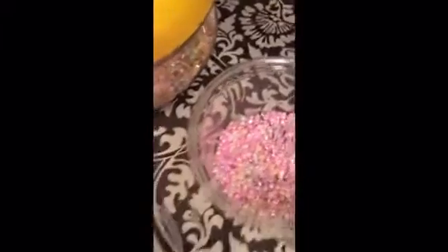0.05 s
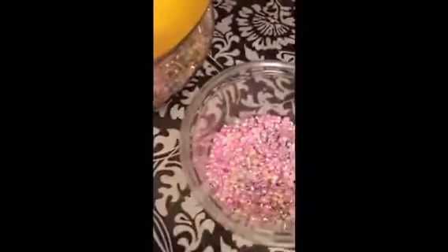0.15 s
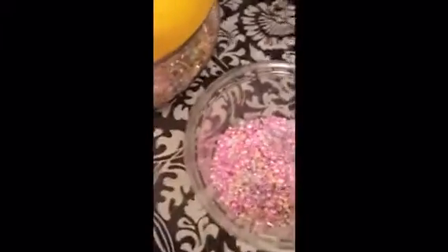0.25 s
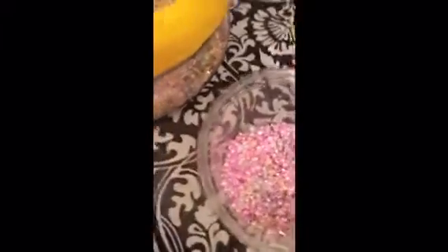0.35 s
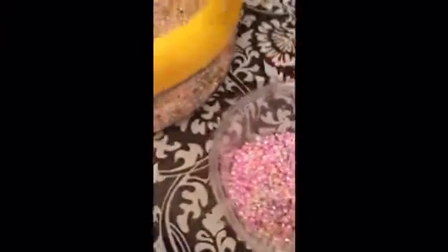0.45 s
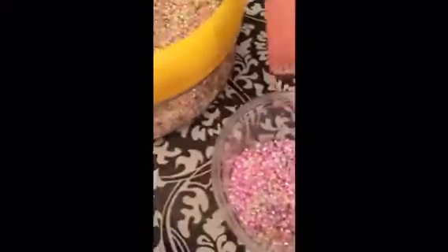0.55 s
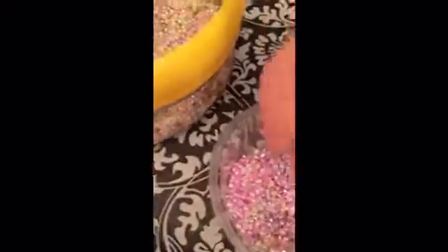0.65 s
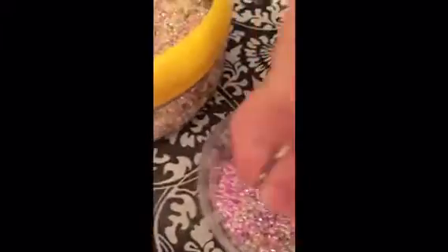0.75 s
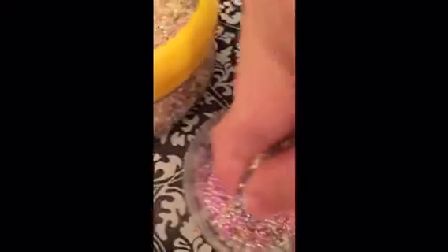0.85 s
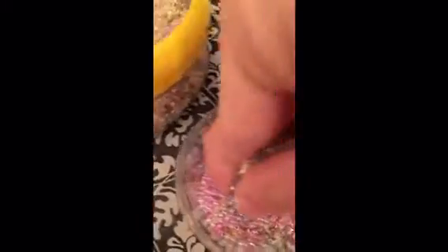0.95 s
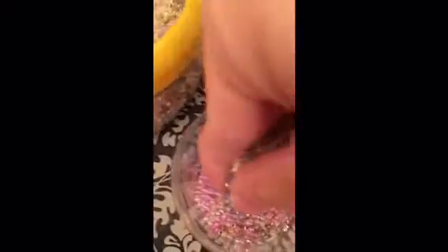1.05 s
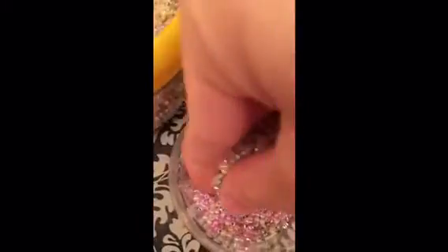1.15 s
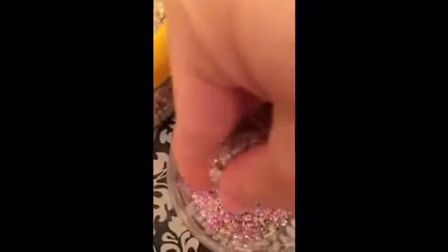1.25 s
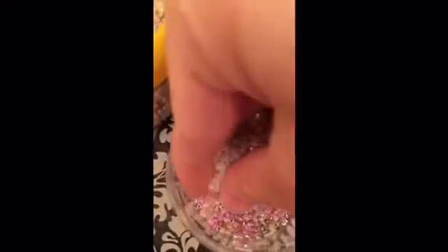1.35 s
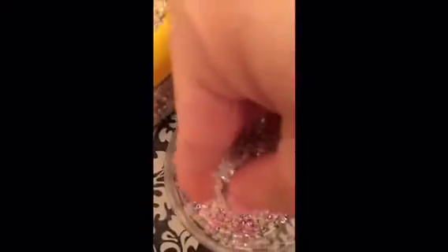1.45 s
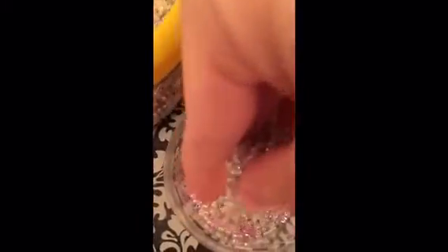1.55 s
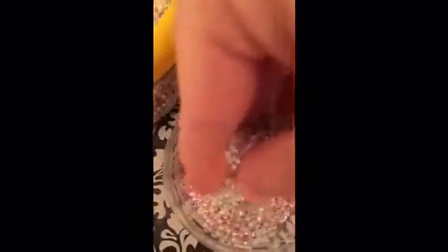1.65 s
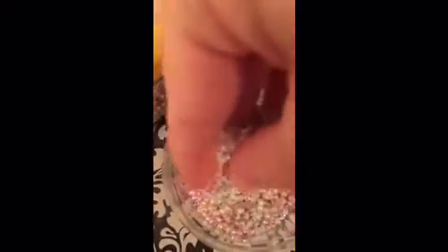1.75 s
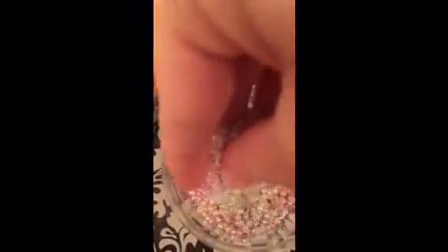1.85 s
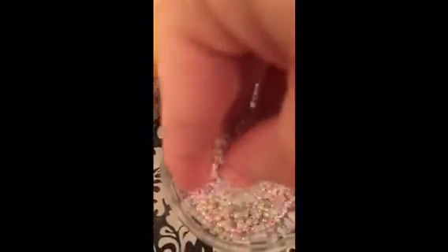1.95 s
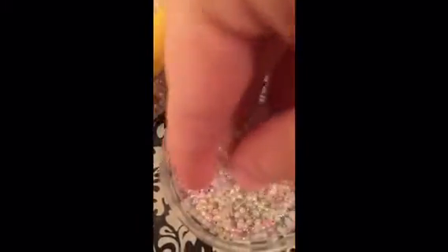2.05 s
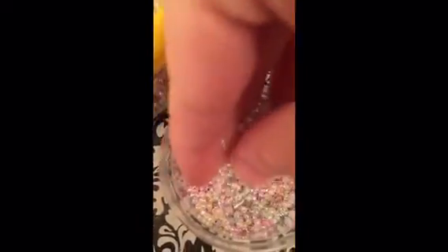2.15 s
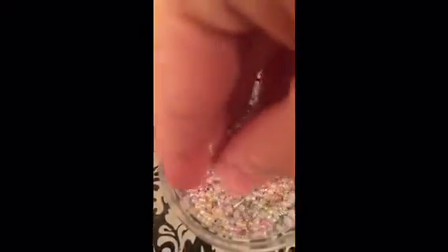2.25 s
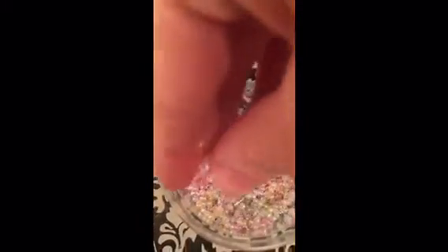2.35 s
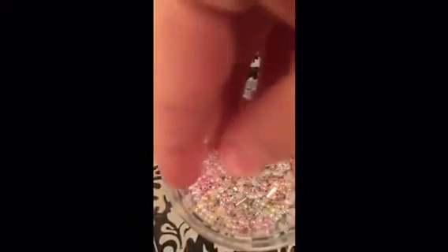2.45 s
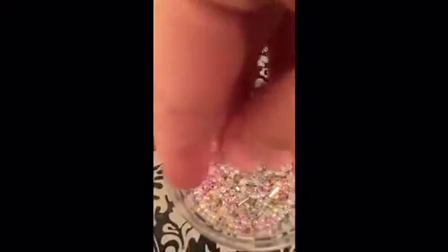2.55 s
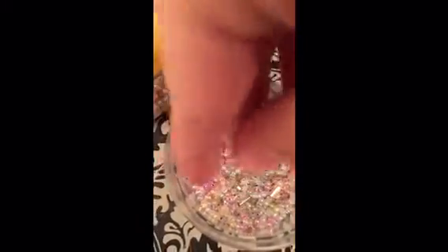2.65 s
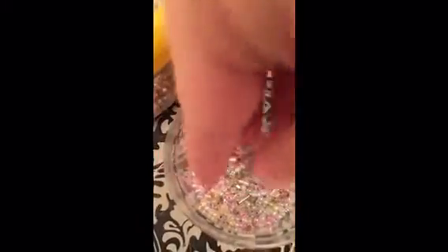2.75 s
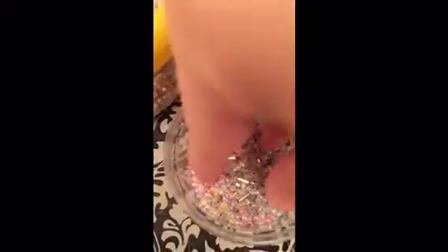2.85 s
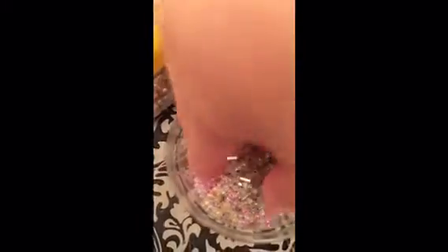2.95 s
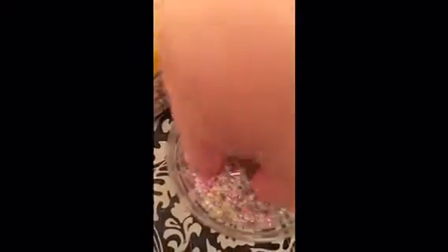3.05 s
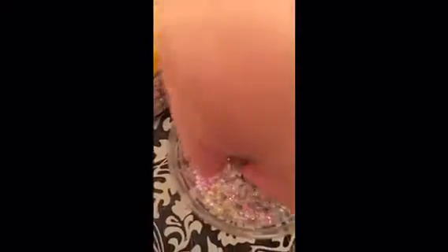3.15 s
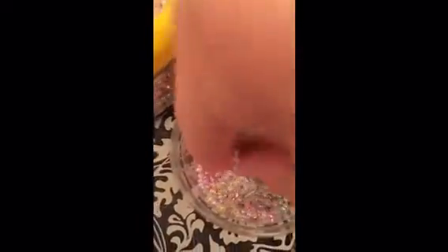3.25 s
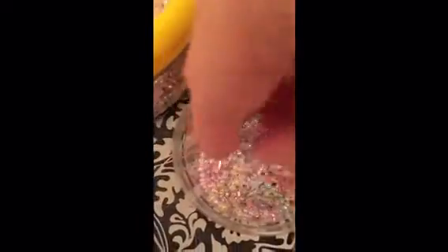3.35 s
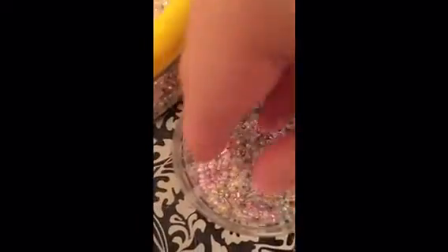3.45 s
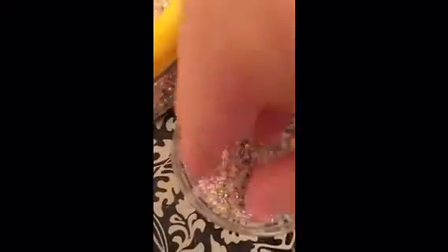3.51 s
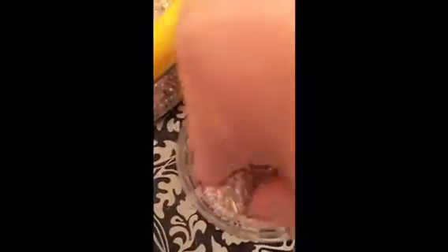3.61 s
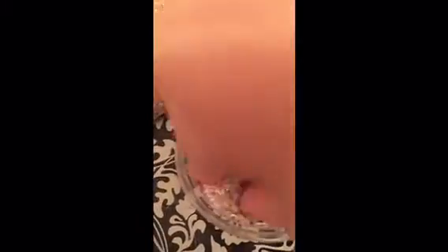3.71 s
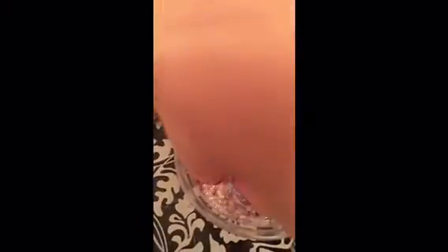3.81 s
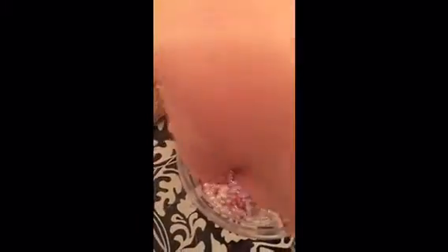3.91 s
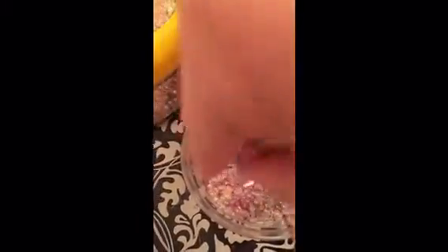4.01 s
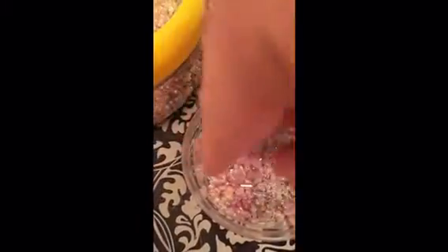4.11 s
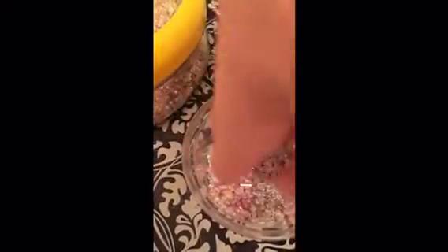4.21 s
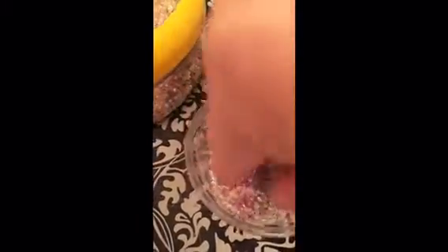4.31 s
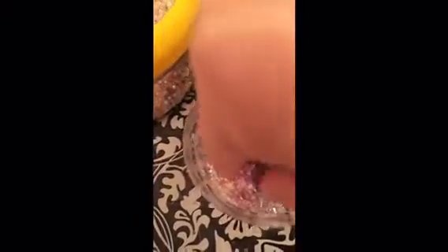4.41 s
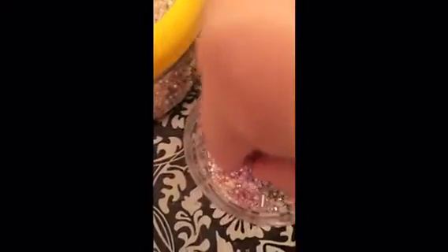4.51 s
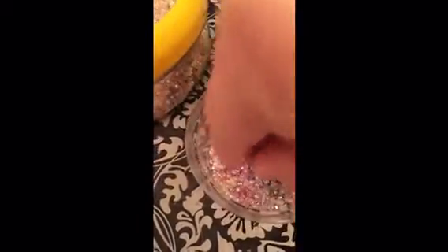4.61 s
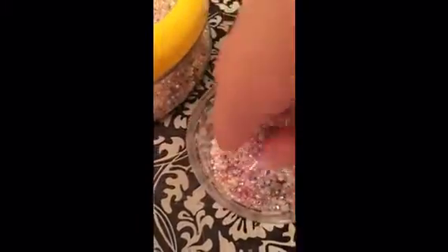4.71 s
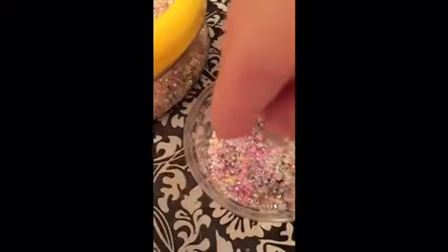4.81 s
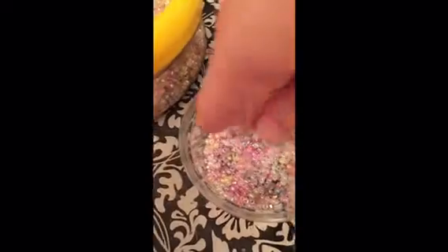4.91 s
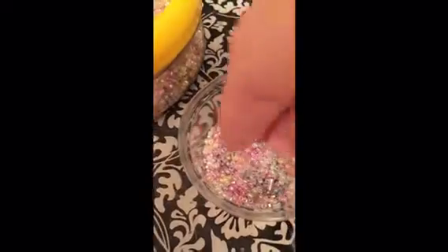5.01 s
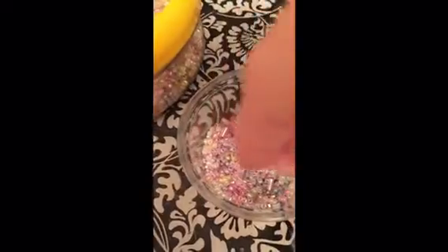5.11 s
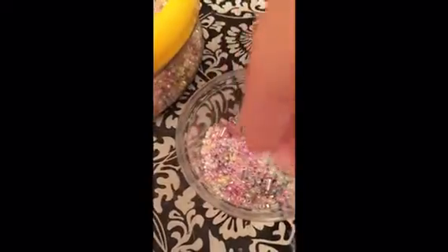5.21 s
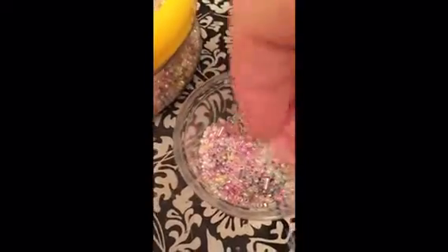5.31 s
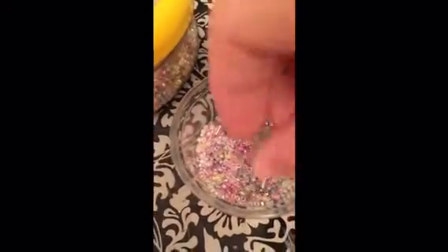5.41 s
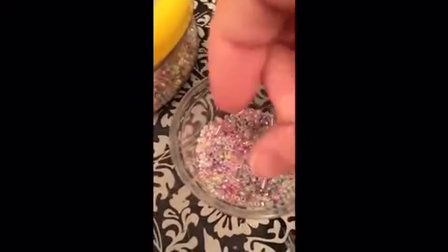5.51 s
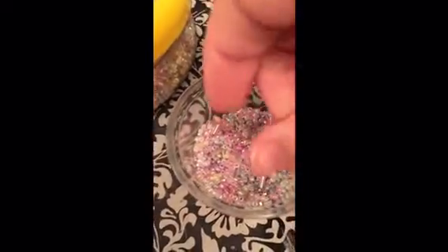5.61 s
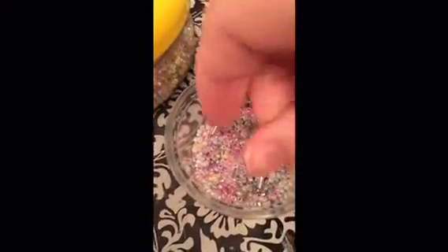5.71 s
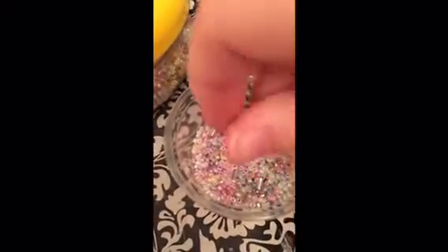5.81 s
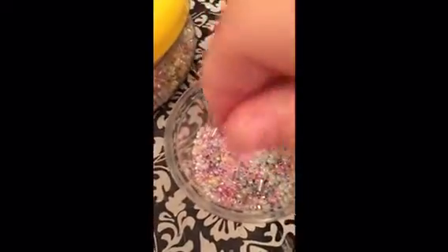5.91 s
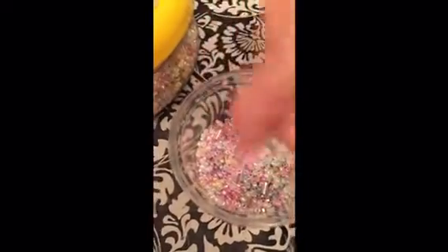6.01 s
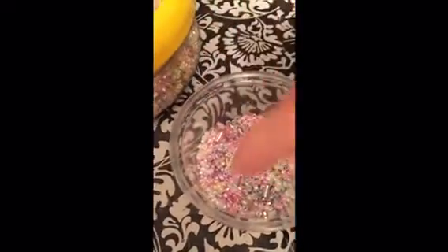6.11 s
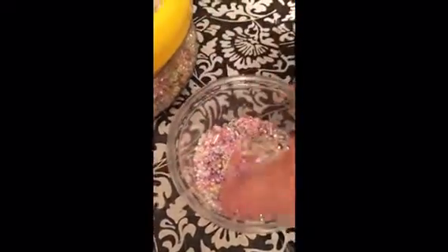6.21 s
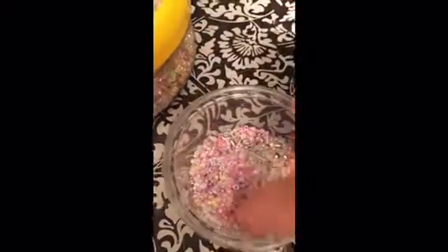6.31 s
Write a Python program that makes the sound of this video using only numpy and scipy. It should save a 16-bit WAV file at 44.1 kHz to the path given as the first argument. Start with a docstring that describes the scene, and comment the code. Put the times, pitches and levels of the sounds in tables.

```python
"""Bright clicks and a dense rustle, close to a phone: fingers dig, pinch and stir small plastic beads
in a glass bowl on a table. Each contact is a filtered pulse scattered through the heap; random contacts
merge into the rustle, single beads click on their own, and damped resonances ring the glass.
Noise bands make the skin's rub, the bumps on the phone and a quiet room with a thin whine behind.
The phone's noise suppressor dulls the hiss about a third of a second after the last sharp sound."""
import sys
import numpy as np
from scipy import signal
from scipy.fft import rfft, irfft
from scipy.io import wavfile
from scipy.ndimage import uniform_filter1d, minimum_filter1d, map_coordinates

SR = 44100
rng = np.random.default_rng(int(sys.argv[2]) if len(sys.argv) > 2 else 0)


def digitize_waveform(pressure):
    """Quantize a signal to 16-bit integers and store it at the path in sys.argv[1].

    Rows of a 2-D input are taken as channels; values are limited to [-1, 1].
    """
    field = np.atleast_2d(pressure).T
    bounded = np.clip(field, -1, 1)
    quanta = np.round(bounded * 32767).astype(np.int16)
    wavfile.write(sys.argv[1], SR, quanta)


N = 280734
TIME = np.arange(N) / SR
EDGE_HZ = 15400  # upper limit of the phone's band
SLIDE_PER_S, SLIDE_KNOCK_DB = 4700, -14.5  # a shove makes the beads slide: dense, light contacts
STROKE_RISE_DB_PER_S, STROKE_FALL_DB_PER_S = 1501.5, 521


# Fingers pinching and stirring the heap. Each row: start in seconds, length in seconds, level in dB,
# growth over the stroke in dB, share of the bowl's low knock in dB, contacts per second.
FINGER_STROKES = [(1.287, 0.041, -25, -3, -7.5, 1020), (1.362, 0.05, -29.5, 1.5, -8.5, 1500),
                  (1.434, 0.22, -28, -0.5, -13, 2000), (1.661, 0.1, -30, -5, -14, 1600),
                  (1.867, 0.16, -25.5, -2, -10.5, 3050), (2.025, .14, -29.5, -4.5, -13, 1830),
                  (2.195, 0.062, -35.5, -6.5, -16.5, 670), (2.322, 0.02, -50, -5.5, -13, 370),
                  (2.399, 0.067, -25, -7, -12, 2600), (2.475, .07, -34.5, -12, -13, 670),
                  (2.7, .05, -48, 0, -17, 310), (3.21, .115, -44.5, 3.5, -16, 2500),
                  (3.338, 0.044, -32, 5.5, -25, 2200), (3.404, 0.044, -32.5, -6.5, -27, 1200),
                  (3.498, .033, -49.5, -8, -7, 450), (3.591, 0.0088, -50.5, 3, -6, 460),
                  (3.743, .17, -43.5, 8.5, -13.5, 3500), (3.921, 0.13, -36, -5.5, -19.5, 2600),
                  (4.061, 0.054, -33, 4, -21, 3000), (4.128, 0.066, -35.5, -8.5, -27, 1100),
                  (4.619, .11, -50, -1.5, -22, 1200), (4.747, 0.011, -39, 7.5, -29, 660),
                  (4.79, 0.068, -53.5, -3, -16, 410)]
# Fingertips shoving down to the bottom of the bowl. Each row: time of full push in seconds,
# rise in dB per second, hold in seconds, level in dB, fall in dB per second, level of the skin's rub in dB.
FINGER_SHOVES = [(2.914, 3500, .02, -32, 180, -53.5), (3.078, 380, 0.067, -37.5, 229, -59.5),
                 (3.657, 2000, 0.015, -26.5, 402, -49.5), (4.351, 1400, 0.028, -29.5, 220, -55.5),
                 (4.516, 450, 0.011, -38.5, 180, -60)]


def movements():
    """Strokes and shoves add in power, which weights their bearing on the glass and contacts per second."""
    moves = []
    for start, length, db, growth_db, knock_db, rate in FINGER_STROKES:
        gain = gesture(start, length, db, growth_db, STROKE_RISE_DB_PER_S, STROKE_FALL_DB_PER_S)
        moves.append((gain, knock_db, rate))
    for start, rise, hold, db, fall, _ in FINGER_SHOVES:
        moves.append((gesture(start, hold, db, 0, rise, fall), SLIDE_KNOCK_DB, SLIDE_PER_S))
    power = sum(gain ** 2 for gain, _, _ in moves)
    press = sum(gain ** 2 * gain_of(knock_db) for gain, knock_db, _ in moves) / power
    rate = sum(gain ** 2 * rate for gain, _, rate in moves) / power
    return np.sqrt(power), press, rate


def gesture(start, length, db, growth_db, rise, fall):
    """Gain of one finger movement: attack, a hold that grows or sags, release (rise and fall in dB per s)."""
    age = TIME - start
    level = db + growth_db * np.clip(age / length, 0, 1)
    level += rise * np.minimum(age, 0)
    level -= fall * np.maximum(age - length, 0)
    return gain_of(np.maximum(level, -150))


# Skin brushing the beads lightly. Each row: time in seconds, level in dB.
SKIN_BRUSH = [(5.72, -84.5), (5.78, -66), (5.825, -62.5), (5.852, -45), (5.875, -78), (5.95, -77),
              (6.15, -103), (6.29, -82), (6.345, -56.5), (6.366, -38)]


def heap(effort, press, rate, brush_knock_db=-17):
    """Beads grind and slide as the fingers work; pressing them on the glass adds the low knock."""
    ticks, knocks = contacts(rate, spread_db=5.2, clump_db=1.2)
    worked = effort * (ticks + press * knocks)
    brush = gain_of(np.interp(TIME, *np.transpose(SKIN_BRUSH), left=-120))
    return worked + brush * (ticks + gain_of(brush_knock_db) * knocks)


def contacts(rate, spread_db, clump_db, count=48, order=12):
    """Random contacts of steady mean power, clumped into small slips; returns their ticks and their knocks."""
    slips = evened(uniform_filter1d(rng.standard_normal(N), size=130))
    uneven = (1500 / rate) ** 0.38  # a fast slide is smoother than a pinch
    spread = spread_db * np.minimum(rng.exponential(1, N), 4)
    strength = gain_of(uneven * (spread + clump_db * slips))
    hits = strength * (rng.random(N) < rate / SR)
    power = uniform_filter1d(uniform_filter1d(hits ** 2, size=800), size=400)
    hits = hits / np.sqrt(abs(power) + 1e-4)
    # only a handful of beads touch at a time, and others take their place as time goes on
    bead = ((count * TIME).astype(int) + rng.integers(0, order, N)) % count

    def played(make):
        return sum(signal.oaconvolve(hits * (bead == k), make())[:N] for k in range(count))

    return played(tick), played(knock)


# Colour of a contact between beads. Each row: frequency in Hz, relative level in dB.
BEAD_COLOUR = [(500, -44.5), (1200, -24.5), (2200, -13.5), (2900, -12.5), (3700, -12.5), (4600, -11),
               (5600, -6.5), (6700, -2), (7400, -2), (8500, 2), (9700, 0), (10500, -4), (12200, 0),
               (15200, -2.5)]


def tick():
    """Bead against bead: a bright pulse with a strong pitch of its own."""
    return contact(BEAD_COLOUR, scatter=0.77, scatter_s=0.0013)


# Colour of a contact that bears on the bowl. Each row: frequency in Hz, relative level in dB.
KNOCK_COLOUR = [(150, -43.5), (600, -28.5), (900, -21.5), (1300, -11), (1700, -9), (2000, -1.5), (2500, -2),
                (2950, -5.5), (3500, -1.5), (5000, -5.5), (9000, -20)]


def knock():
    """The push of a bead on the bowl: a lower pulse with a broad, weak pitch."""
    return contact(KNOCK_COLOUR, scatter=.55, scatter_s=.0012, ring_db=2.5, ring_octaves=0.6, tilt_db=2.15)


def contact(colour, scatter, scatter_s, ring_db=9, ring_octaves=0.26, tilt_db=1.5, smear_s=0.00012, size=1024):
    """One click of unit energy: a sharp pulse with its own pitch, then its scatter through the heap."""
    signed_hz = np.fft.fftfreq(size, 1 / SR)
    hz = abs(signed_hz) + 1
    t = np.arange(size) / SR
    octave = np.log2(hz / 7000)
    pitch = rng.uniform(-1.086, 0.92)  # octaves from 7 kHz
    own = ring_db * np.exp(-((octave - pitch) / ring_octaves) ** 2)
    tilt = tilt_db * rng.standard_normal() * np.maximum(octave, -2)
    level = read(colour, hz) + own + tilt
    level = level - 20 * np.clip((hz - EDGE_HZ) / 1000, 0, 1)
    pulse = np.exp(np.conj(signal.hilbert(np.log(gain_of(level)))))  # causal phase
    # the heap delays high notes a little more
    pulse = pulse * np.exp(-1j * np.pi * signed_hz * smear_s * (1 + hz / EDGE_HZ))
    paths = scatter * unit(rng.standard_normal(size) * np.exp(-t / scatter_s))
    paths[0] = 1  # the direct path
    click = unit(np.fft.ifft(pulse * np.fft.fft(paths)).real)
    return rng.choice([-1, 1]) * click


# Single beads that snap free or drop. Each row: time in seconds, level in dB over one millisecond
# (before softening, glass and room), share of the bowl's low knock in dB.
BEAD_CLICKS = [(0.277, -41.5, -11), (0.337, -43, -30), (1.0656, -26.5, 0), (1.0666, -21.5, -11.5),
               (1.0715, -25, -13), (1.1577, -40, -30), (1.2398, -19.5, -8.5), (1.242, -16.5, 1.5),
               (1.261, -20.5, -13), (1.2822, -21, -4), (1.3125, -20, -3.5), (1.3325, -24, -8),
               (1.4094, -25.5, -9), (1.4842, -22, -13.5), (1.5887, -22, -5), (1.715, -24, -2),
               (1.7443, -14.5, -13), (1.8147, -23.5, -13.5), (1.8275, -15, -1), (1.8408, -21, -7),
               (1.8545, -21, -4.5), (1.8884, -17.5, 1), (2.1185, -15.5, -8), (2.1578, -14, -12),
               (2.2123, -23.5, -26), (2.2364, -21.5, -13), (2.2931, -26.5, -15.5), (2.3224, -22, -7.5),
               (2.3392, -19, -3), (2.3496, -21, -9), (2.367, -17, -11), (2.3833, -17.5, -13),
               (2.4456, -10, -22), (2.525, -23.5, 4), (2.5423, -17, -17), (2.6098, -28, -8),
               (2.611, -25.5, -11.5), (2.6426, -31.5, -15), (2.6802, -38.5, -22.5), (2.7092, -31, -26),
               (2.7304, -18, -17), (2.7325, -19, -13), (2.759, -34, -14), (2.7766, -42, -17),
               (2.832, -48, -10), (2.9308, -16.5, -27), (3.2317, -26, -10.5), (3.2655, -26, -18),
               (3.3782, -18.5, -19), (3.4969, -26, -2.5), (3.501, -21.5, -14), (3.534, -22, -10),
               (3.5844, -24, -23), (3.987, -21.5, -7.5), (4.1335, -24, -30), (4.1909, -23, -19),
               (4.2504, -27.5, -31), (4.7155, -22.5, -17.5), (4.7393, -27, -26), (4.7802, -26, -11),
               (4.7974, -24, -20), (4.822, -24.5, -31), (4.8468, -26.5, -26), (4.8805, -42, -23),
               (4.924, -45, -10), (4.9518, -36, -11), (4.958, -32.5, -16), (4.9928, -26.5, -17),
               (5.0172, -38, -17), (5.0258, -30, -15), (5.0728, -25.5, -7), (5.122, -29.5, -3.5),
               (5.1623, -46, -13)]


def single_beads(graze_db=-14, rebound_db=-19):
    """Each bead grazes a neighbour, strikes, and rebounds faintly a moment later."""
    out = np.zeros(N)
    for s, db, knock_db in BEAD_CLICKS:
        size = gain_of(db) * np.sqrt(SR / 1000)
        add(out, s - rng.uniform(0.0005, 0.0048), size * gain_of(graze_db) * tick())
        add(out, s, size * unit(tick() + gain_of(knock_db) * knock()))
        add(out, s + rng.uniform(0.0011, 0.0082), size * gain_of(rebound_db) * tick())
    return out


UNSETTLED_FROM_S, UNSETTLED_TO_S = 1.25, 5.17  # the disturbed heap keeps shedding beads between these


def loose_beads(effort, press, rate, snap_db=7, idle_db=-50, scatter_db=4.0, knock_db=6, count=170):
    """Jammed beads snap free, harder under a pinch than in a slide; between strokes faint ones settle."""
    out = np.zeros(N)
    slots = np.linspace(UNSETTLED_FROM_S, UNSETTLED_TO_S, count + 1)
    times = rng.uniform(slots[:-1], slots[1:])
    lucks = np.clip(rng.standard_normal(count), -2, 2)
    for s, luck in zip(times, lucks):
        now = round(s * SR)
        pinch = np.clip(2 * (1 - rate[now] / SLIDE_PER_S), 0, 1)
        snap = gain_of(snap_db) * effort[now] * pinch
        size = (snap + gain_of(idle_db)) * gain_of(scatter_db * luck) * np.sqrt(SR / 1000)
        add(out, s, size * unit(tick() + gain_of(knock_db) * press[now] * knock()))
    return out


def soften(x, top_db=-4, corner_hz=11500):
    """Separate clicks, dropped or snapped free, have weaker highest treble than the rustle of the worked heap."""
    hz = np.fft.rfftfreq(N, 1 / SR)
    return irfft(rfft(x) * gain_of(top_db / (1 + (corner_hz / (hz + 1)) ** 8)), N)


# The glass, damped by its filling. Each row: frequency in Hz, relative level in dB,
# time to fall by 60 dB in seconds.
GLASS_MODES = [(2380, 0, 0.017), (2535, -9, .03), (3590, -1, 0.0073), (4520, -1, .022), (6680, 0, 0.02),
               (8610, -10, 0.01), (9350, -2.5, 0.02)]


def bowl(x, ring_db, size=3000):
    """The glass rings briefly after every contact, as a sum of decaying cosines."""
    t = np.arange(size) / SR
    ring = sum(gain_of(db - 60 * t / t60) * np.cos(2 * np.pi * hz * t) for hz, db, t60 in GLASS_MODES)
    return x + gain_of(ring_db) * signal.oaconvolve(x, unit(ring))[:N]


def hand(x, echo=0.13, delay_s=0.000494, travel=0.315):
    """The moving palm throws the sound back after a changing delay, so its colour keeps shifting."""
    delay = delay_s * np.exp(travel * wander(.25))
    reflected = map_coordinates(x, [(TIME - delay) * SR], order=3)
    return (x + echo * reflected) / np.sqrt(1 + echo ** 2)


# Spectrum of the skin's dull rub. Each row: frequency in Hz, relative density in dB per Hz.
RUB_COLOUR = [(60, -8), (180, 3), (300, 6), (500, -10.5), (800, -5), (1100, 0.5), (1500, -8), (2500, -18),
              (6000, -48.5)]


def fingertips(judder_db=3):
    """Soft skin drags through the packed beads during a shove with a dull, juddering rub."""
    push = sum(gesture(s, hold, rub_db, 0, rise, fall) for s, rise, hold, _, fall, rub_db in FINGER_SHOVES)
    rub = noise(lambda f: gain_of(read(RUB_COLOUR, f)))
    return rub * push * gain_of(judder_db * wander(.008))


# Soft bumps of the hand on the phone. Each row: start in seconds, rms level in dB before the rise and decay,
# centre in Hz, time to decay to 1/e in seconds.
PHONE_BUMPS = [(.003, -59.5, 770, 0.032), (0.045, -51, 610, 0.016), (.058, -54, 805, .03),
               (.094, -51, 700, 0.02), (.143, -49, 422, 0.0084), (.146, -50.5, 720, 0.013),
               (.274, -52, 840, 0.0096), (.41, -39.5, 68.6, 0.026)]


def bumps(rise_s=0.0043):
    """Dull short bumps right at the phone: narrow noise with a quick rise and an exponential decay."""
    out = np.zeros(N)
    for s, db, hz, decay in PHONE_BUMPS:
        age = np.maximum(TIME - s, 0)
        envelope = np.minimum(age / rise_s, 1) * np.exp(-age / decay)
        out += gain_of(db) * band(hz, 0.15 * hz) * envelope
    return out


def reflections(x, early_db=-19, early_s=0.0037, tail_db=-23, t60=0.12, size=20000):
    """Quick reflections from the table, then a faint short tail of the room."""
    t = np.arange(size) / SR
    early = unit(rng.standard_normal(size) * np.exp(-t / early_s) * (t > .001))
    tail = unit(rng.standard_normal(size) * gain_of(-60 * t / t60) * (t > .006))
    return x + signal.oaconvolve(x, gain_of(early_db) * early + gain_of(tail_db) * tail)[:N]


# Spectrum of the quiet room. Each row: frequency in Hz, relative density in dB per Hz.
ROOM_COLOUR = [(15, -19.5), (30, -7), (50, -4), (72, 0.5), (95, -7.5), (125, -0.5), (170, -13), (300, -13),
               (420, -24), (680, -24.5), (800, -32), (1100, -31), (3000, -38.5), (15000, -44.5)]
# Steady low hum in the room. Each row: centre in Hz, full width at half gain in Hz, level in dB.
ROOM_HUM = [(71.3, 26, -55.5), (119.6, 6.1, -60)]
# A thin whine that comes and goes. Each row: time in seconds, level in dB before its waver.
WHINE_LEVEL = [(0, -73), (1.05, -73.5), (1.2, -78), (5.45, -79.5), (5.6, -72), (5.8, -74.5), (5.95, -70),
               (6.1, -76.5), (6.37, -72)]


def background(room_db=-51, whine_hz=2150, whine_width_hz=55, waver_db=3, swell_db=0.83):
    """Low rumble and hiss that swell a little, hum, and a thin wavering whine, all of shaped noise."""
    air = noise(lambda f: gain_of(read(ROOM_COLOUR, f))) * gain_of(room_db + swell_db * wander(.07))
    hum = sum(gain_of(db) * band(hz, width / 2) for hz, width, db in ROOM_HUM)
    whine_db = np.interp(TIME, *np.transpose(WHINE_LEVEL)) + waver_db * wander(0.031)
    whine = band(whine_hz, whine_width_hz) * gain_of(whine_db)
    return air + hum + whine


def gain_of(db):
    """Amplitude gain of a level in dB."""
    return 10 ** (np.asarray(db) / 20)


def evened(x):
    """Scale to unit rms."""
    return x / np.sqrt(np.mean(x ** 2) + 1e-20)


def unit(x):
    """Scale to unit energy."""
    return x / np.sqrt(np.sum(x ** 2) + 1e-20)


def read(points, hz):
    """Read a curve of (Hz, dB) along log frequency."""
    f, value = np.transpose(points)
    return np.interp(np.log(hz + 1), np.log(f + 1), value)


def add(mix, s, sound):
    """Add a sound at s seconds, cut at the end of the mix."""
    part = mix[max(round(s * SR), 0):][:len(sound)]
    part += sound[:len(part)]


def noise(shape):
    """Steady noise of unit rms, coloured by the gain shape(Hz)."""
    spectrum = rfft(rng.standard_normal(N)) * shape(np.fft.rfftfreq(N, 1 / SR))
    return evened(irfft(spectrum, N))


def band(hz, width):
    """Noise in one resonance, at half gain one width (Hz) from its centre."""
    return noise(lambda f: 1 / (1 + ((f - hz) / width) ** 2))


def wander(seconds):
    """Random drift: normal draws of unit size, one per given time, joined by straight lines."""
    steps = np.arange(0, N / SR + 1, seconds)
    return np.interp(TIME, steps, rng.standard_normal(len(steps)))


def scene():
    """The pressed heap rings the glass more than separate clicks do; rub, bumps and room are added."""
    fingers = movements()
    stirred = bowl(heap(*fingers), ring_db=-15)
    separate = bowl(soften(single_beads() + loose_beads(*fingers)), ring_db=-21.5)
    beads = reflections(hand(stirred + separate))
    return (beads + fingertips() + bumps() + background())[None]


def suppress(x, open_db=-41, hold_s=0.36, release_s=0.098, depth_db=-10, corner_hz=1800):
    """Noise suppressor: the treble is turned down until a sharp sound opens it, and stays up for a while."""
    hz = np.fft.rfftfreq(N, 1 / SR)
    treble = irfft(rfft(x) * hz ** 2 / (hz ** 2 + corner_hz ** 2), N)
    loud = uniform_filter1d(treble ** 2, size=64) > gain_of(open_db) ** 2
    since = TIME - np.maximum.accumulate(np.where(loud, TIME, -10))  # seconds since the last sharp sound
    shut = np.clip((since - hold_s) / release_s, 0, 1)
    return x - shut * (1 - gain_of(depth_db)) * treble


def limit(x, ceiling, size=33):
    """Fast limiter: the gain dips for about 1.5 ms around each of the sharpest peaks."""
    allowed = ceiling / np.maximum(abs(x), ceiling)
    return x * uniform_filter1d(minimum_filter1d(allowed, size), size)


def record(dry):
    """The phone: noise suppression, peak limiting, then the band limit."""
    limited = limit(suppress(dry[0]), ceiling=.48)
    low_pass = signal.firwin(401, EDGE_HZ, window=("kaiser", 8), fs=SR)
    return signal.oaconvolve(limited, low_pass, "same")[None]


dry = scene()
out = record(dry)
digitize_waveform(out)
```